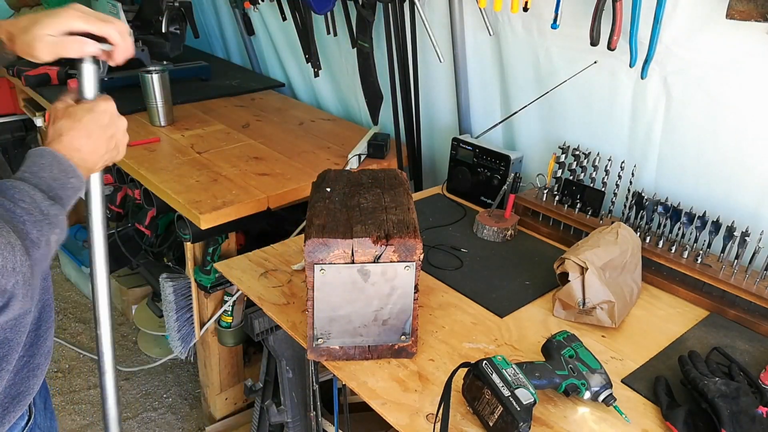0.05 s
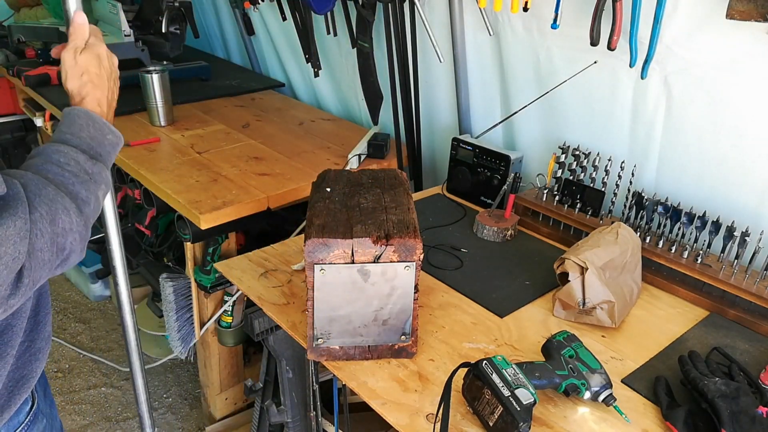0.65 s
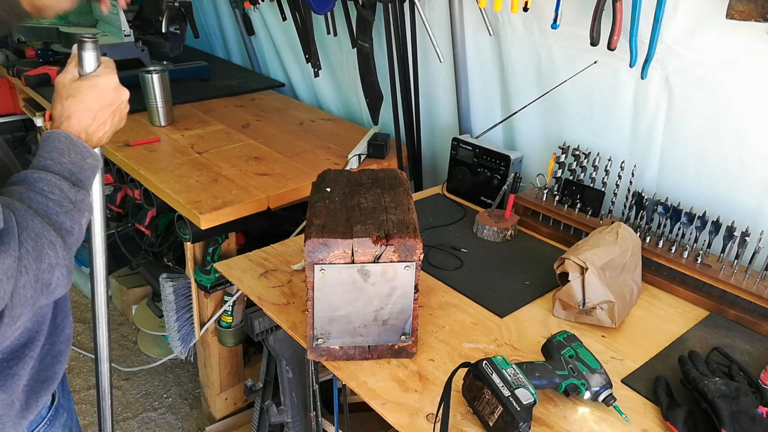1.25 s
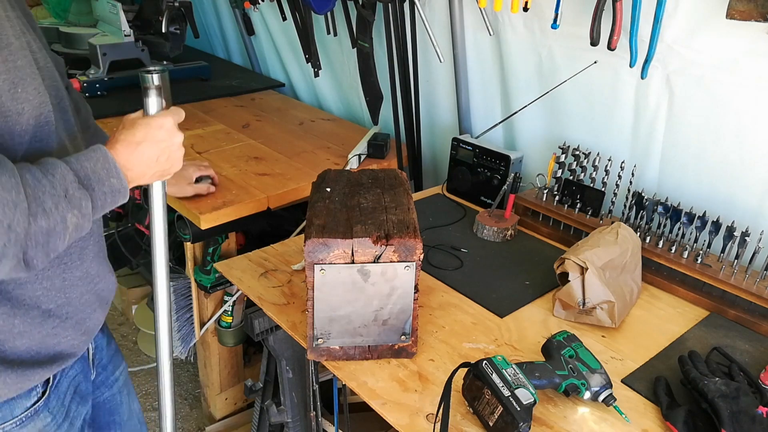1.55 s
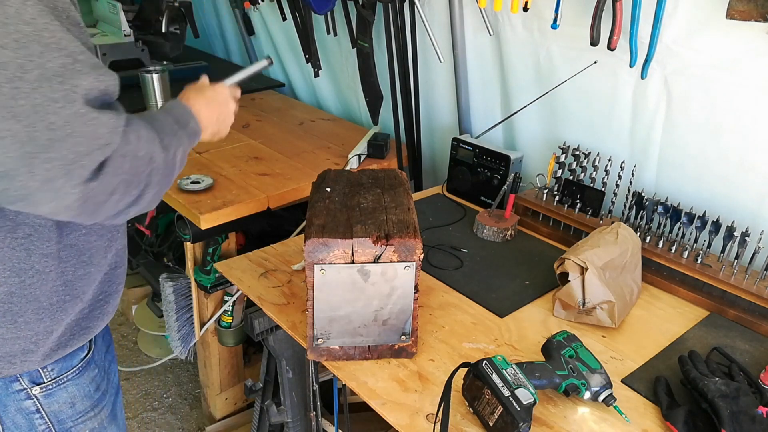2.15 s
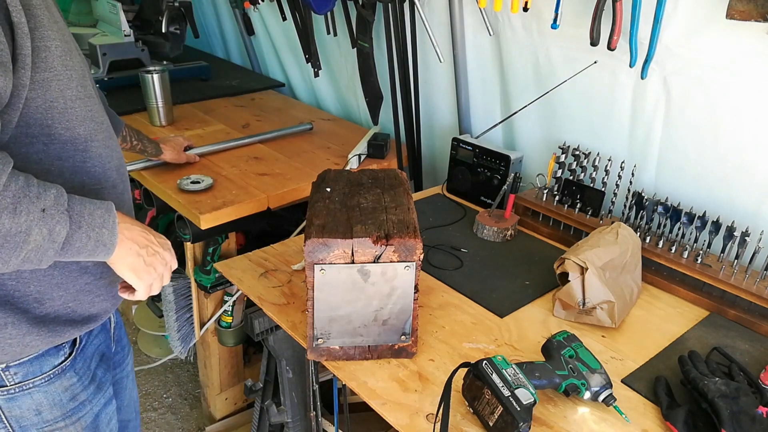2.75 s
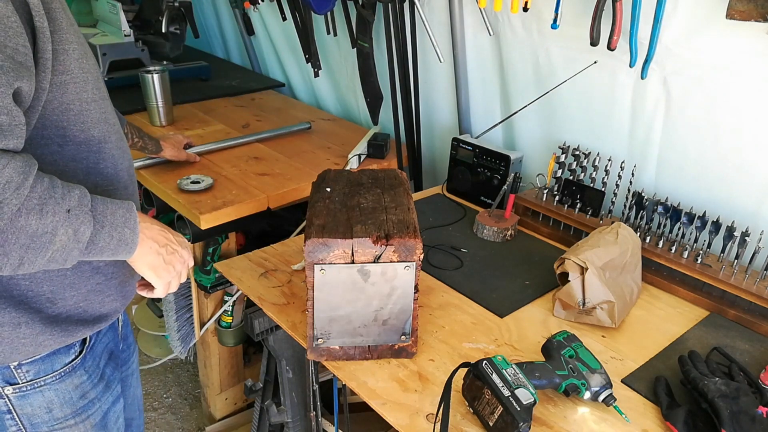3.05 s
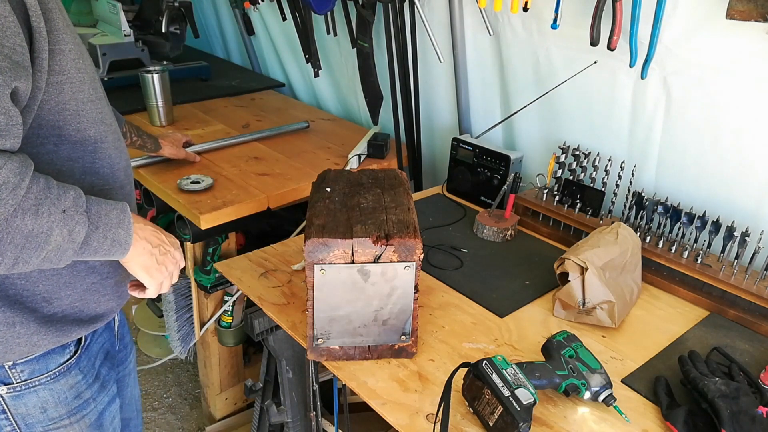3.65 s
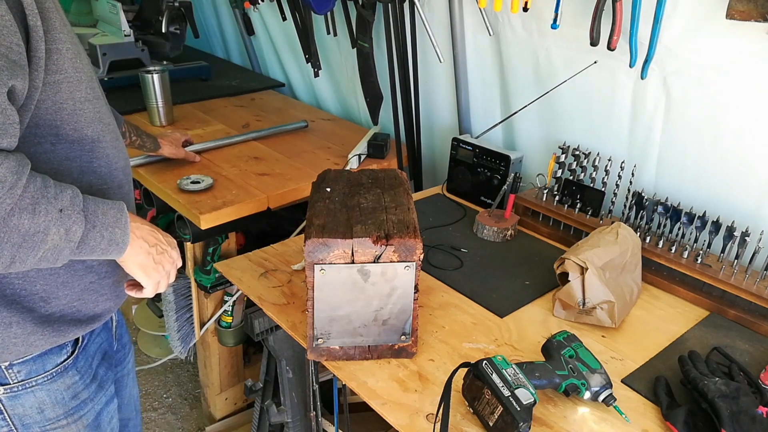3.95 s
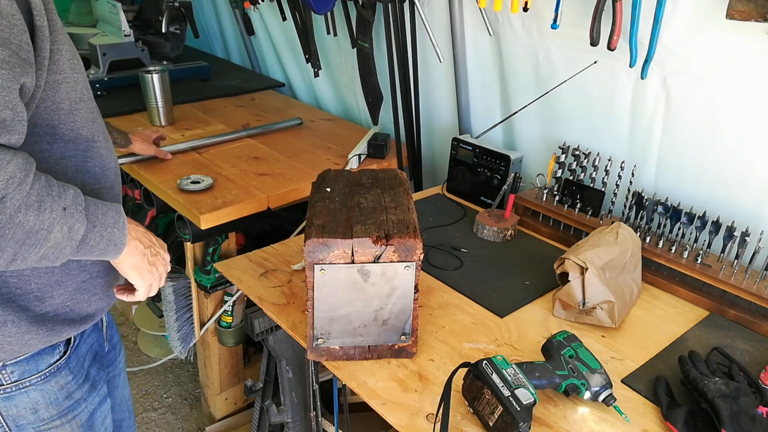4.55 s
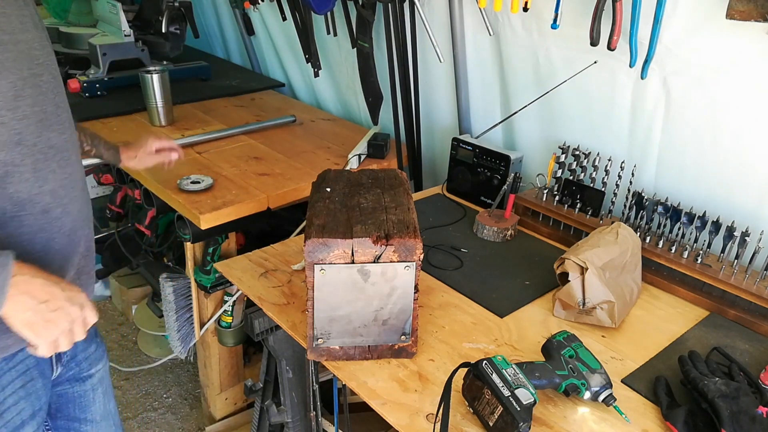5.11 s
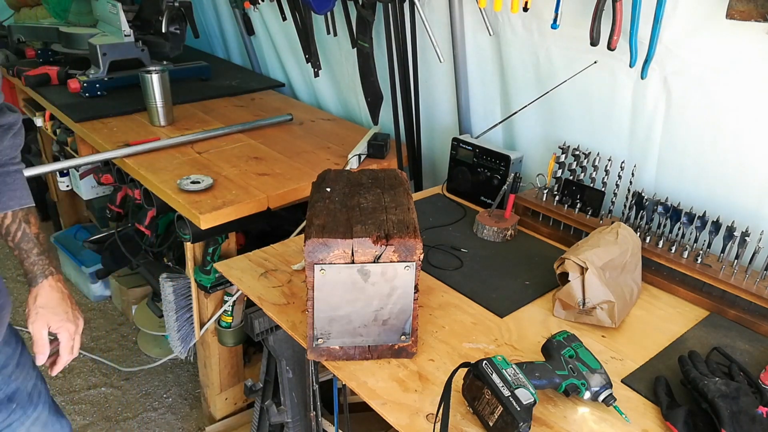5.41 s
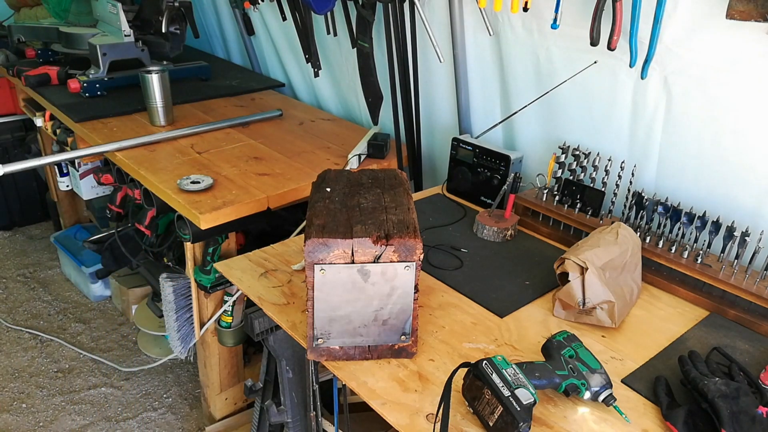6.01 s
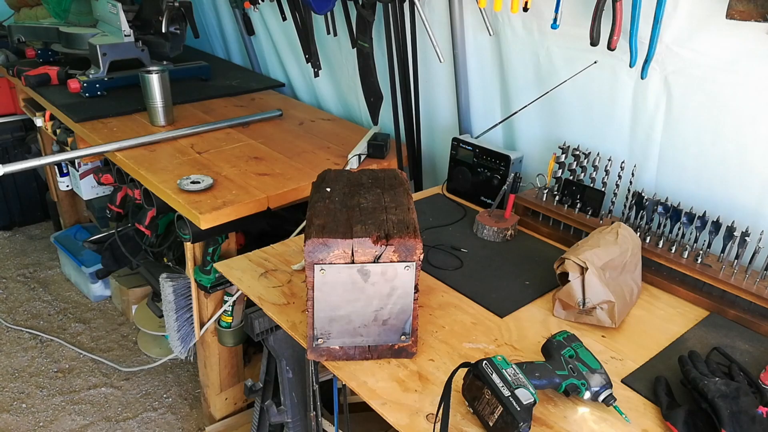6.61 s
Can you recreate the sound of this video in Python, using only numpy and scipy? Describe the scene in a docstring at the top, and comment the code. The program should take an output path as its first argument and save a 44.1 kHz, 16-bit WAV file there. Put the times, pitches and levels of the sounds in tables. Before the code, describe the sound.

In a small, dry workshop, a steel pipe is twisted out of its fitting with faint scrapes and sliding palms. The fitting is set on a wooden bench with a few soft taps, then the pipe lands with one sharp, chattering knock and a brief ring. Sleeves swish and shoes scuff quietly as the person steps away. The microphone is close, and a distant motor hums faintly.

```python
"""A steel pipe lands on a wooden bench with one chattering knock: impacts excite the modes of both,
and the hand damps them. Before that, friction in the thread drives the pipe's resonances as it is
twisted out of its flange, and the flange is put down with soft taps. Sleeves swish and shoes scuff
as the person steps away; a far motor hums. A two-port microphone stands close by in the small,
dry workshop."""
import sys
import numpy as np
from scipy import signal
from scipy.fft import rfft, irfft, next_fast_len
from scipy.io import wavfile

SR = 44100
rng = np.random.default_rng(int(sys.argv[2]) if len(sys.argv) > 2 else 0)


def transcribe(u):
    """Save the signal u as a 16-bit wav file named by the first command-line argument.

    u: samples, shape (n,) or (channels, n), limited to [-1, 1]; the rate is SR.
    q: integer samples, one column per channel.
    """
    v = np.clip(np.atleast_2d(u).T, -1, 1)
    q = np.round(v * 32767).astype(np.int16)
    wavfile.write(sys.argv[1], SR, q)


N = 298673
TIME = np.arange(N) / SR

# Levels are relative; those of noise spectra are spectral densities.
# contacts of the pipe chattering on the bench: t/s, level/dB, cut-off f/Hz (higher is harder)
CONTACTS = [(2.4869, -7.5, 8950), (2.4916, -1, 2380), (2.4947, 2, 5000), (2.5009, -5.5, 8000),
            (2.5184, -6.5, 1800), (2.5319, -5.5, 2820), (2.54, -14, 2300), (2.5519, -12.5, 2300),
            (2.569, -22, 1500)]
# modes of the loaded bench top: f/Hz, level/dB, T60/s
BENCH_MODES = [(129.3, -7, 0.27), (145.5, -2, 0.09), (233.5, -7, 0.26), (254, -1, 0.16),
               (300.6, -0.5, 0.16), (301.5, -7, 0.16), (357, -9.5, 0.1), (429.7, -2.5, 0.14),
               (450, -10.5, 0.056), (461, -8.5, 0.25), (468.3, -2, 0.16), (744, -7.5, 0.28),
               (740, -18.5, 0.1), (788, -10.5, 0.16), (820, 0.5, 0.16), (887, -0.5, 0.16), (857, 1, 0.26),
               (939, 6.5, 0.18), (942.0, 2, 0.14), (1090, -14.5, 0.16), (1128, -9, 0.14),
               (1040, -15.5, 0.099), (1080, -14.5, 0.13), (1355, -7, 0.16), (1418, -4, 0.23),
               (1400, -4.5, 0.16), (1430, -12.5, 0.14), (1504, -7, 0.16)]
# high bending modes of the pipe: f/Hz, level/dB, T60/s
PIPE_MODES = [(1990, 1, 0.11), (2842, -3, .14), (3890, -10, 0.4), (5010, -2.5, .12), (6196, 1, 0.15)]
# spectrum of the bench's dense clatter: f/Hz, level/dB
CLATTER_SPECTRUM = [(60, -34.5), (85, -6.5), (110, -1.5), (190, -6), (260, -8), (340, -3.5), (480, -7),
                    (560, -9), (660, -13), (780, -1), (950, -4), (1500, -6.5), (2050, -16.5), (2450, -24),
                    (3300, -27), (4800, -23.5), (8000, -32.5), (10500, -36.5), (15000, -60)]
# decay of that clatter: f/Hz, T60/s
CLATTER_DECAY = [(100, 0.082), (400, 0.12), (1000, 0.073), (3000, 0.2), (9000, .1)]
# balance of the knock: f/Hz, left minus right level/dB
KNOCK_BALANCE = [(110, 1.5), (380, -0.5), (700, 3.5), (1100, -1), (2400, 6), (4400, 0), (15000, 4.5)]
# taps of flange and hand on the bench: t/s, level/dB, cut-off f/Hz
BENCH_TAPS = [(1.669, -41.5, 724), (1.777, -32.5, 1500), (1.79, -38, 7000), (1.830, -44, 600),
              (1.865, -49.5, 1100), (1.875, -38.5, 1400), (1.896, -40, 1050), (2.427, -42, 504)]
# turns of the pipe in its thread: t/s, hold/s, level/dB
THREAD_TURNS = [(0.29, 0.069, -57), (0.54, 0.029, -54.5), (0.787, 0.015, -52.5), (1.06, 0.043, -57.5)]
# friction spectrum of the thread: f/Hz, level/dB
THREAD_SPECTRUM = [(300, -28), (800, -6.5), (1300, -5.5), (2100, 0), (2500, -14.5), (3400, -2),
                   (4500, -11.5), (7000, -10), (9500, -8), (11000, -17.5), (15000, -32)]
# resonances of the gripped pipe: f/Hz, width/Hz, gain/dB
GRIPPED_RESONANCES = [(1125, 126, 9.5), (1510, 280, 7), (2884, 155, 19), (3906, 190, 18.5),
                      (5020, 210, 19.5), (6200, 310, 15), (7520, 160, 13.5), (8960, 520, 11)]
# palms sliding on the pipe: peak t/s, level/dB, rise/s, cupped-hand resonance f/Hz
PALM_SLIDES = [(0.035, -49.5, 0.046, 726), (0.155, -55, 0.0073, 680), (0.235, -65.5, 0.059, 330),
               (0.564, -55, 0.011, 1510), (0.669, -63, 0.0065, 1140), (1.068, -50, 0.0039, 1230),
               (1.111, -50.5, .015, 1210), (1.454, -43, 0.016, 1350)]
# low resonances and dips of pipe and hand: f/Hz, width/Hz, gain/dB
HOLLOW_RESONANCES = [(402, 270, 2), (790, 310, 3), (1004, 63, -3.5), (1156, 26, 14), (1440, 48, -7),
                     (1630, 100, 7.5)]
# clothes in motion (long rows: turning, walking): t/s, hold/s, level/dB, treble offset/dB
CLOTH_MOVES = [(0.0, .025, -53.5, -6.5), (0.093, 0.14, -71.5, 1), (0.96, .015, -66.5, -5.5),
               (1.184, 0.82, -71.5, -0.5), (1.293, 0.067, -64.5, -8), (2.431, 0.036, -63, -7),
               (5.042, 0.0017, -58.5, 5.5), (5.075, 1.56, -70.5, -3.5), (5.082, .012, -57.5, -3.5),
               (5.129, 0.061, -51.5, -5), (5.232, 0.14, -71, -16), (5.425, 0.043, -62, -6),
               (5.565, 0.018, -62.5, 3), (5.749, .06, -59.5, -5), (5.875, .015, -85, 24),
               (6.02, .12, -59, -4), (6.517, 0.044, -63, 6.5), (6.686, 0.099, -57, -15)]
# friction spectrum of fabric: f/Hz, level/dB
CLOTH_SPECTRUM = [(120, -52), (200, -7), (304, -4.5), (371, -12), (454, -5.5), (515, -15.5), (906, 1.5),
                  (992, -5), (1110, -2.5), (6470, -8), (11000, -22), (15500, -29)]
# a sleeve brushing the body: t/s, hold/s, level/dB
SLEEVE_SWISHES = [(1.988, 0.0081, -49), (2.028, 0.025, -55.5), (2.176, 0.026, -47), (2.264, 0.0078, -57),
                  (2.366, 0.033, -56), (2.676, .003, -65), (2.81, .06, -66.5), (3.864, 0.012, -50.5),
                  (3.987, 0.011, -57.5), (4.068, 0.039, -58.5), (4.146, 0.025, -65.5),
                  (4.244, 0.012, -59.5), (4.31, 0.0057, -65.5), (4.376, 0.01, -62)]
# friction spectrum of the sleeve: f/Hz, level/dB
SLEEVE_SPECTRUM = [(240, -72), (400, -19), (770, -16), (934, -6.5), (1400, -1), (1690, -6), (2050, -3),
                   (3510, -9), (5480, -6.5), (6270, -9.5), (8070, -25.5), (14000, -40.5)]
# shoes scuffing the floor, and at 1.448 s the pipe scraping out of its flange: t/s, hold/s, level/dB, grit
# offset/dB
SHOE_SCUFFS = [(0.01, 0.047, -55, -3.5), (1.128, 0.0051, -48, -7.5), (1.448, .016, -48.5, -4.5),
               (5.164, .014, -49.5, -20), (5.657, 0.021, -45, -9.5), (5.951, 0.0086, -47.5, -4.5),
               (6.035, 0.023, -54.5, 2.5), (6.387, 0.012, -47.5, 5), (6.437, 0.052, -50, 1.5),
               (6.73, .025, -53.5, -11)]
# dull friction spectrum of soles and palms: f/Hz, level/dB
DULL_RUB_SPECTRUM = [(88, -37), (150, -1), (216, -2.5), (404, 0.5), (522, -2), (627, 3.5), (1210, 4.5),
                     (3150, -3), (4630, -5), (5760, -18), (6320, -33.5), (12000, -53), (15600, -70),
                     (22000, -120)]
# spectrum of grit underfoot: f/Hz, level/dB
GRIT_SPECTRUM = [(700, -22), (2500, 0.5), (4500, 1), (6800, 3.5), (8500, -1), (10000, -10), (15500, -18)]
# soft footfalls: peak t/s, level/dB, f/Hz
FOOTFALLS = [(5.668, -53, 243), (6.379, -52, 380), (6.467, -60, 405), (6.68, -61, 620)]
# pulses of a thin squeak: peak t/s, level/dB
SQUEAK_PULSES = [(6.088, -64), (6.128, -54.5)]
# its two whistles: lower f/Hz, upper f/Hz
SQUEAK_WHISTLES = [5480, 15400]
# low bumps at the microphone: peak t/s, level/dB, half length/s
LOW_BUMPS = [(2.087, -51.5, 0.037), (2.193, -57, 0.042), (3.155, -39, 0.0074), (3.742, -54.5, 0.0094),
             (4.054, -55, .012), (4.184, -51, .015), (4.245, -53, 0.029), (5.374, -45.5, 0.014),
             (5.45, -54.5, 0.053)]
# spectrum of the bumps: f/Hz, level/dB
BUMP_SPECTRUM = [(15, -15), (40, 3), (75, -9.5), (130, -22), (300, -53), (1000, -94)]
# the far motor under load: throttle opens t/s, throttle closes t/s
MOTOR_PULLS = [(-.15, 2.55), (4.122, 7.0)]
# spectrum of its rumble: f/Hz, level/dB
RUMBLE_SPECTRUM = [(50, -24.5), (100, -3), (130, -2), (170, -0.5), (230, -16), (350, -24.5), (700, -62.5)]
# spectrum of the still room: f/Hz, level/dB
ROOM_SPECTRUM = [(12, -34), (20, -6), (76, -7), (112, -13.5), (170, -16.5), (260, -17.5), (420, -22),
                 (600, -21.5), (850, -22), (1200, -23), (2000, -27), (3400, -26), (8000, -31), (15500, -38)]
# likeness of noise at the two ports: f/Hz, correlation coefficient
PORT_CORRELATION = [(60, 0.96), (130, 0.89), (290, .4), (640, -0.68), (1400, 0.23), (3000, -0.032),
                    (15000, 0)]


def knock(wood_db=-21, bench_db=-33.5, pipe_db=-45.5, grip_s=2.56, damping_db_per_s=380, pipe_share=0.65):
    """Impact excitation: each contact shakes bench and pipe; the hand's grip then adds damping."""
    t = np.arange(SR // 3) / SR
    wood = amp(bench_db) * ring(BENCH_MODES)
    for s, db, cutoff_hz in CONTACTS:
        add(wood, s, amp(db + wood_db) * butter(clatter(t), cutoff_hz, "low", order=1))
    damping_db = damping_db_per_s * np.clip(TIME - grip_s, 0, 1)
    wood = butter(wood, 90, "high", order=4) * amp(-damping_db)
    steel = amp(pipe_db - pipe_share * damping_db) * ring(PIPE_MODES)
    return filtered(wood + steel, lambda hz: pan(read(KNOCK_BALANCE, hz)))


def ring(modes, right_lag_s=.00018):
    """Damped modes: every contact adds energy, which decays exponentially in between."""
    start = CONTACTS[0][0]
    t, out = np.arange(SR // 3) / SR, np.zeros((2, N))
    port_time = t - np.array([[0], [right_lag_s]])
    blows = np.zeros(len(t))
    for s, db, _ in CONTACTS:
        blows[round((s - start) * SR)] += amp(db) ** 2
    for (hz, db, t60), phase in zip(modes, rng.random(len(modes))):
        energy_kept = amp(-60 / (t60 * SR)) ** 2  # per sample
        energy = signal.lfilter([1], [1, -energy_kept], blows)
        envelope = butter(np.sqrt(energy), hz / 4, "low")
        add(out, start, amp(db) * envelope * np.sin(2 * np.pi * (hz * port_time + phase)))
    return out


def clatter(t):
    """Modal overlap: bench, tools and nearby walls merge into noise, each band with its own decay."""
    hz, frame_s, bands = signal.stft(noise(CLATTER_SPECTRUM, size=len(t)), SR, nperseg=256)
    decay = amp(-60 * frame_s / read(CLATTER_DECAY, hz)[:, None])
    return signal.istft(bands * decay, SR, nperseg=256)[1][:, :len(t)]


def bench_sag(s=2.497, level_db=-27.5, hz=138, rise_s=0.006, fall_s=.008):
    """Elastic deflection: the bench top gives under the pipe and springs back in one low pulse."""
    return swells([(s, level_db, rise_s, fall_s, 0)]) * np.cos(2 * np.pi * hz * (TIME - s))


def taps(rise_cycles=2.2, crack_gain=1.9, crack_s=0.0017, low_cut_ratio=.22):
    """Light impacts on the bench: the softer the contact, the slower the onset and the duller the tap."""
    t, out = np.arange(SR // 3) / SR, np.zeros((2, N))
    crack = 1 + crack_gain * np.exp(-t / crack_s)
    for s, db, cutoff_hz in BENCH_TAPS:
        onset = 1 - np.exp(-t * cutoff_hz / rise_cycles)
        blow = butter(clatter(t) * onset * crack, cutoff_hz, "low", order=4)
        add(out, s, amp(db) * butter(blow, low_cut_ratio * cutoff_hz, "high"))
    return out * pan(side_db=2)


def thread(gain_db=5):
    """Forced vibration: the thread grinds at each turn and drives the gripped pipe's resonances."""
    turning = strokes(THREAD_TURNS, attack_s=0.023, release_s=0.025)
    grind = rubbing(THREAD_SPECTRUM, grain_db=3, judder_db=1.3)
    return amp(gain_db) * pan(side_db=1) * turning * resonant(grind, GRIPPED_RESONANCES)


def palms(cup_width_hz=600, cup_db=10, fall_ratio=1.68, side_db=2):
    """Cavity resonance: the cupped hand colours the rub of skin sliding on steel."""
    rub = noise(DULL_RUB_SPECTRUM, grain_db=3)
    out = np.zeros((2, N))
    for s, db, rise_s, cup_hz in PALM_SLIDES:
        slide = swells([(s, db, rise_s, fall_ratio * rise_s, side_db)])
        out += slide * resonant(rub, HOLLOW_RESONANCES + [(cup_hz, cup_width_hz, cup_db)])
    return out


def clothes(gain_db=1, split_hz=6000, top_hz=9000, grain_db=3.5, attack_s=0.011, release_s=0.021):
    """Sliding friction of fabric on fabric, in two bands: each move has its own brightness."""
    body_level, treble_level = paired_strokes(CLOTH_MOVES, attack_s, release_s)
    rub = rubbing(CLOTH_SPECTRUM, grain_db, judder_db=2.5)
    body = unit_rms(butter(rub, split_hz, "low", order=4))
    treble = butter(noise(CLOTH_SPECTRUM, grain_db), split_hz, "high", order=4)
    treble = unit_rms(butter(treble, top_hz, "low"))
    return amp(gain_db) * pan(side_db=1) * (body_level * body + treble_level * treble)


def sleeves():
    """Brief sliding friction: a sleeve brushes the body with a grainy swish."""
    brushing = strokes(SLEEVE_SWISHES, attack_s=0.0064, release_s=.019)
    return pan(side_db=-2) * brushing * rubbing(SLEEVE_SPECTRUM, grain_db=3, judder_db=1.5)


def shoes():
    """Friction on a rough floor: the sole rubs dully while grit crunches under it."""
    sole_level, grit_level = paired_strokes(SHOE_SCUFFS, attack_s=0.015, release_s=0.026)
    sole = sole_level * rubbing(DULL_RUB_SPECTRUM, grain_db=4, judder_db=2)
    grit = grit_level * rubbing(GRIT_SPECTRUM, grain_db=2.5, judder_db=2)
    return pan(side_db=2) * (sole + grit)


def heels(rise_s=0.01, fall_s=0.013, width_hz=170, side_db=1):
    """Soft impact: each heel lands with a dull pat, a short burst in one low band."""
    return sum(swells([(s, db, rise_s, fall_s, side_db)]) * noise_band(hz, width_hz)
               for s, db, hz in FOOTFALLS)


def squeak(width_hz=70, upper_db=-5, swell_s=0.017, side_db=-1):
    """Friction-excited resonance: two narrow, faint whistles."""
    lower_hz, upper_hz = SQUEAK_WHISTLES
    pulses = swells([(s, db, swell_s, swell_s, side_db) for s, db in SQUEAK_PULSES])
    return pulses * (noise_band(lower_hz, width_hz) + amp(upper_db) * noise_band(upper_hz, width_hz))


def bumps():
    """Long wavelengths: soft, deep thumps arrive nearly alike at both ports."""
    return swells([(s, db, half_s, half_s, 0) for s, db, half_s in LOW_BUMPS]) * noise(BUMP_SPECTRUM)


def motor(idle_hz=105, work_hz=119, spin_up_s=.2, spin_down_s=0.2415,
          hum_db=-67.5, coast_db=-19.5, throb_db=-0.5, rumble_idle_db=-78, rumble_work_db=-67):
    """Rotational inertia: speed lags the throttle in a motor that hums and rumbles through the walls."""
    load, coast = np.zeros(N), np.zeros(N)
    for opens, closes in MOTOR_PULLS:
        load += (TIME < closes) * (1 - np.exp(-np.maximum(TIME - opens, 0) / spin_up_s))
        coast += (TIME >= closes) * np.exp(-np.maximum(TIME - closes, 0) / spin_down_s)
    drift, throb = (unit_rms(butter(z, 9, "low")) for z in rng.standard_normal((2, N)))
    waver = 1 + (0.0055 + .014 * load) * drift
    pitch_hz = (idle_hz + (work_hz - idle_hz) * (load + coast)) * waver
    hum_rms = amp(hum_db + coast_db * coast + throb_db * throb)  # dips as the throttle closes
    hum = np.sqrt(2) * hum_rms * np.sin(2 * np.pi * np.cumsum(pitch_hz) / SR)
    rumble = amp(rumble_idle_db + (rumble_work_db - rumble_idle_db) * load) * noise(RUMBLE_SPECTRUM)
    return hum + rumble


def hiss(start_s=0.016, hold_s=.19, level_db=-73, low_hz=9500, fade_s=.015):
    """High-passed white noise: a thin, airy hiss in the first moment."""
    envelope = strokes([(start_s, hold_s, level_db)], fade_s, fade_s)
    return envelope * unit_rms(butter(rng.standard_normal((2, N)), low_hz, "high"))


def room_air(level_db=-66):
    """Stationary noise: the still room, strongest in the bass."""
    return amp(level_db) * noise(ROOM_SPECTRUM)


def rubbing(spectrum, grain_db, judder_db, judder_hz=45):
    """Stick-slip friction: noise that catches and lets go in lumps, with early echoes."""
    judder = unit_rms(butter(rng.standard_normal(N), judder_hz, "low"))
    return reflected(noise(spectrum, grain_db) * amp(judder_db * np.clip(judder, -2, 2)))


def reflected(x, echo_db=-10, count=6):
    """Early reflections from bench, floor and wall, different at each port."""
    out = x.copy()
    for port in range(2):
        for delay_s, sign in zip(rng.uniform(.001, .012, count), rng.choice([-1, 1], count)):
            out[port] += sign * amp(echo_db) * np.roll(x[port], round(delay_s * SR))
    return unit_rms(out)


def noise(spectrum, grain_db=0, size=N):
    """Partly coherent stereo noise, alike only in the bass; grain makes tiny slips of uneven size."""
    white = rng.standard_normal((2, size))
    slips = np.repeat(rng.standard_normal(size // 32 + 1), 32)[:size]

    def mid_side_gain(hz):
        correlation = np.clip(read(PORT_CORRELATION, hz), -1, 1)
        return amp(read(spectrum, hz)) * np.sqrt([1 + correlation, 1 - correlation])

    mid, side = filtered(white * amp(grain_db * slips), mid_side_gain)
    return unit_rms(np.array([mid + side, mid - side]))


def noise_band(centre_hz, width_hz):
    """Random excitation of a single resonance, in stereo."""
    return unit_rms(filtered(rng.standard_normal((2, N)), lambda hz: peak(hz, centre_hz, width_hz)))


def resonant(x, resonances):
    """Resonant colouring: peaks and dips add in decibels; the result has rms 1."""
    return unit_rms(filtered(x, lambda hz: amp(sum(db * peak(hz, f, w) for f, w, db in resonances))))


def peak(hz, centre_hz, width_hz):
    """Lorentzian resonance curve of height 1."""
    return 1 / (1 + (2 * (hz - centre_hz) / width_hz) ** 2)


def strokes(rows, attack_s, release_s):
    """Envelope of strokes: a Gaussian rise up to each time, a hold, an exponential decay."""
    out = np.zeros(N)
    for s, hold_s, db in rows:
        early = np.maximum(s - TIME, 0) / attack_s
        late = np.maximum(TIME - s - hold_s, 0) / release_s
        out += amp(db) * np.exp(-np.minimum(early ** 2 + late, 20))
    return out


def paired_strokes(rows, attack_s, release_s):
    """Two envelopes of the same strokes, the second shifted by each row's level offset."""
    plain = [(s, hold_s, db) for s, hold_s, db, _ in rows]
    shifted = [(s, hold_s, db + offset_db) for s, hold_s, db, offset_db in rows]
    return strokes(plain, attack_s, release_s), strokes(shifted, attack_s, release_s)


def swells(rows):
    """Stereo envelope of Gaussian pulses with separate rise and fall times."""
    out = np.zeros((2, N))
    for s, db, rise_s, fall_s, side_db in rows:
        from_peak = np.clip((TIME - s) / np.where(TIME < s, rise_s, fall_s), -10, 10)
        out += pan(side_db) * amp(db) * np.exp(-from_peak ** 2)
    return out


def amp(db):
    """Decibels to amplitude ratio."""
    return 10 ** (np.asarray(db) / 20)


def unit_rms(x):
    """Normalisation to rms 1."""
    return x / np.sqrt(np.mean(x ** 2) + 1e-20)


def read(points, hz):
    """Interpolation of a table on a log-frequency axis."""
    f, value = np.transpose(points)
    return np.interp(np.log(hz + 1), np.log(f + 1), value)


def pan(side_db):
    """Left and right gains for a level difference; positive is left."""
    return amp(np.array([[.5], [-.5]]) * side_db)


def add(mix, s, sound):
    """Superposition of a stereo sound on the mix at time s."""
    part = mix[:, round(s * SR):][:, :sound.shape[1]]
    part += sound[:, :part.shape[1]]


def filtered(x, gain):
    """Zero-phase filtering by a gain given as a function of frequency."""
    size = next_fast_len(x.shape[1] + 2048)
    return irfft(rfft(x, size) * gain(np.fft.rfftfreq(size, 1 / SR)), size)[:, :x.shape[1]]


def butter(x, hz, kind, order=2):
    """Causal low-pass or high-pass."""
    sections = signal.butter(order, np.clip(hz, 10, SR / 2 - 100), kind, fs=SR, output="sos")
    return signal.sosfilt(sections, x)


def scene():
    """Linear superposition of all sources at the two ports."""
    background = room_air() + motor() + bumps() + hiss()
    pipe = knock() + bench_sag() + taps() + thread() + palms()
    return pipe + squeak() + clothes() + sleeves() + shoes() + heels() + background


def record(dry):
    """Band limiting: a steep linear-phase low-pass at 15.8 kHz."""
    low_pass = signal.firwin(511, 15800, window=("kaiser", 9), fs=SR)
    return signal.oaconvolve(dry, low_pass[None], "same")


dry = scene()
out = record(dry)
transcribe(out)
```